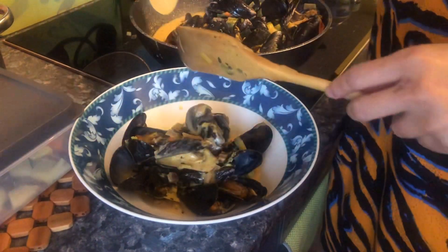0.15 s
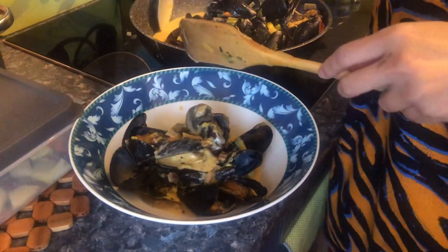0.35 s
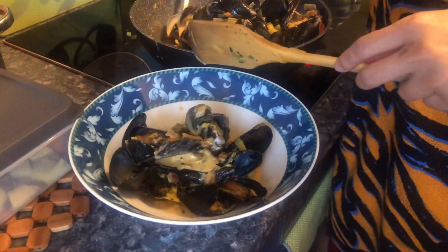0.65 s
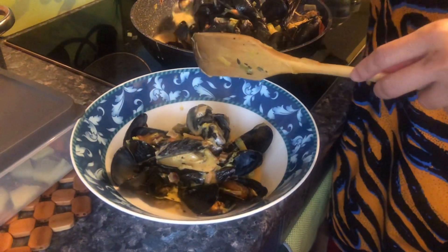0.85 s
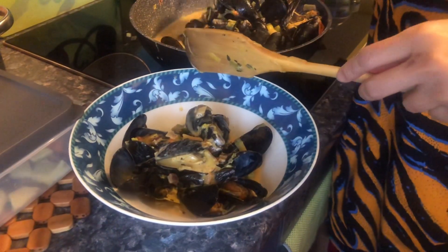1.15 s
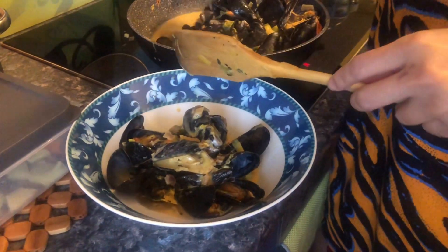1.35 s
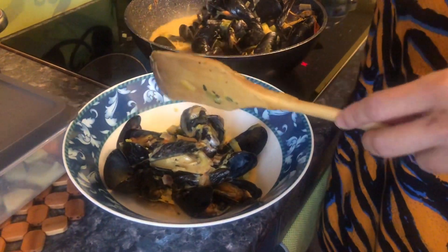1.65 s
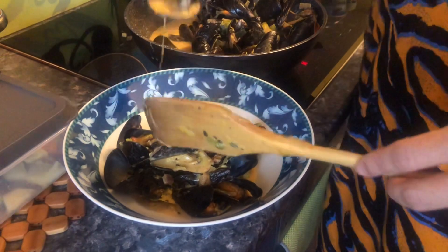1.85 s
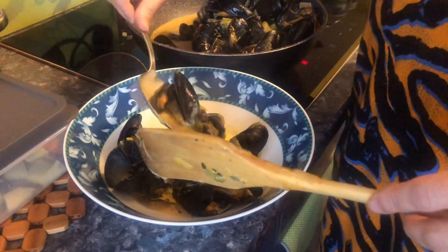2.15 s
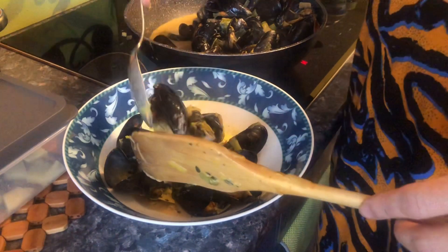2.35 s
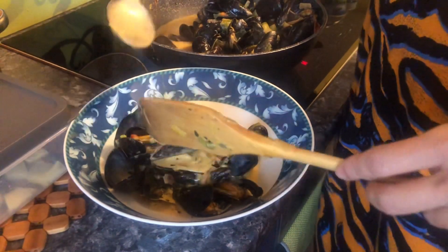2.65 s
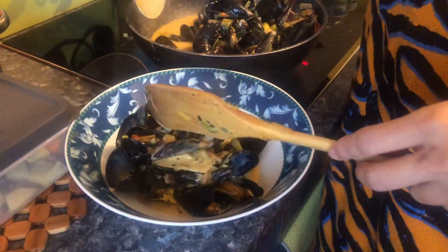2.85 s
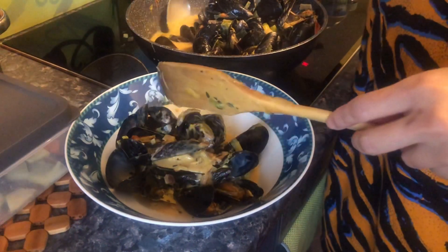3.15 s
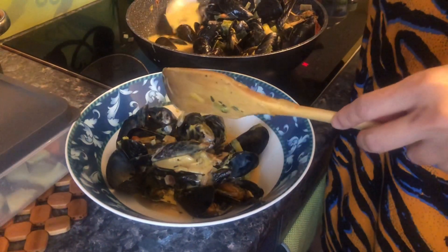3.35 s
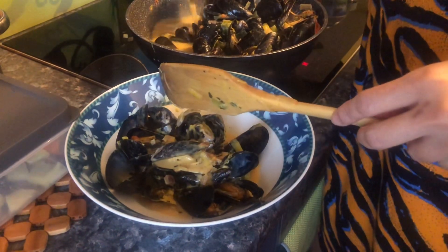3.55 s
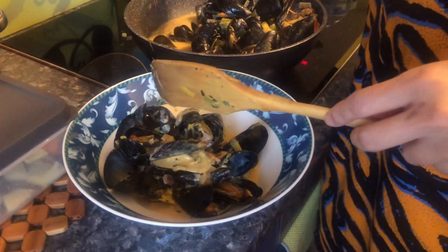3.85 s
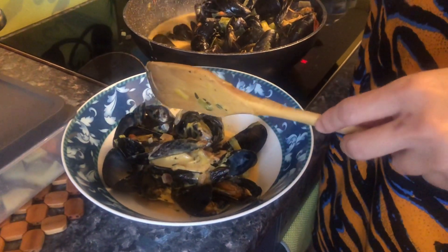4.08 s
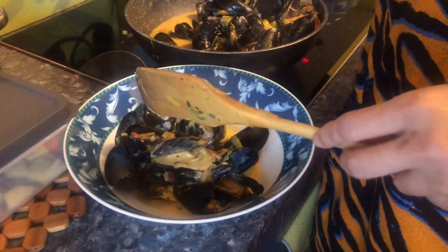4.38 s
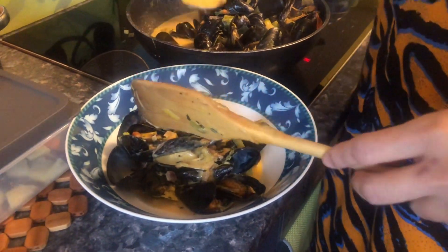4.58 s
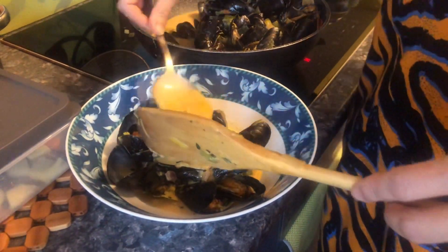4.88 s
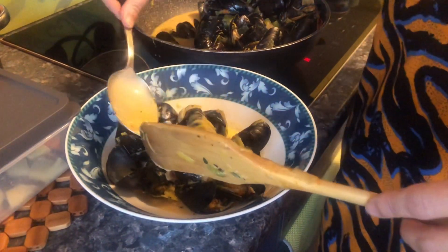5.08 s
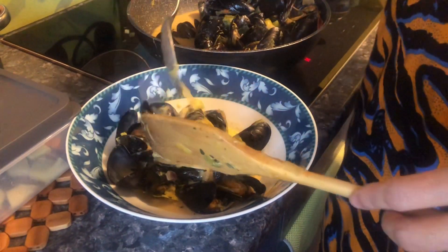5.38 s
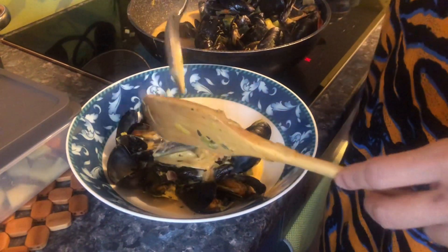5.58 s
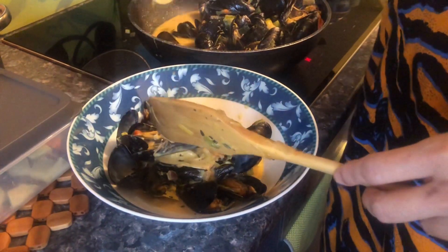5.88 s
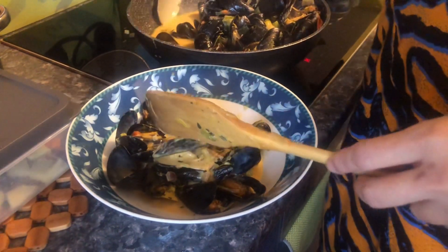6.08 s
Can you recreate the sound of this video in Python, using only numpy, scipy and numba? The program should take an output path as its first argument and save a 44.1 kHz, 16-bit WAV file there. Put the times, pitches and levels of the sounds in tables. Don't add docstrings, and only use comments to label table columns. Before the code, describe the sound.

Dry, hollow shells knock against a spoon, pot and glazed bowl in separate clusters. Sharp clicks die almost at once, with little scrapes, wet fizzing ticks and a short clear bowl ring between them. The worktop thuds dully under the pot. Nearly mono phone pickup, close, with short hard-room echoes, steady hiss, rumble and a very faint high whine.

```python
import sys
import numpy as np
from scipy import signal
from scipy.fft import rfft, irfft
from scipy.io import wavfile
from scipy.ndimage import uniform_filter1d
from numba import njit

SR = 44100
rng = np.random.default_rng(int(sys.argv[2]) if len(sys.argv) > 2 else 0)


def gain_from_db(level_db):
    decades = np.asarray(level_db, float) / 20
    return 10 ** decades


def dump_mix(stems):
    frames = np.atleast_2d(stems).T
    limited = np.clip(frames, -1, 1)
    pcm = np.round(limited * 32767).astype(np.int16)
    wavfile.write(sys.argv[1], SR, pcm)


N = 274322

# hollow/dB, body/dB, edge/dB
POT_KNOCKS = [(0.38, -27.5, -6.5, -9, -5), (0.5134, -42.5, -3, -25, 1), (0.5864, -19, -11, -8.5, -8),
              (0.6809, -39, 5, 12, -2.5), (0.7598, -29, -20.5, -9.5, -20), (1.1799, -35, -10, -9, -5),
              (1.1981, -28.5, -25, -18, -14), (3.0022, -31, -8.5, -12, -7.5),
              (3.0354, -22.5, -10.5, -20, 0), (3.2113, -17.5, -17.5, -6.5, -15),
              (3.24, -21.5, -9, -0.5, -2), (3.3303, -21.5, -22, -5.5, -8.5), (3.7054, -51, -14, 3, -16),
              (3.7664, -23.5, -19, -4.5, -7.5), (6.0931, -31, -6.5, -16, -11)]
BOWL_KNOCKS = [(2.0164, -59.5, -3, 6, 9), (2.153, -49, -17, -16, -6), (2.1708, -37, -24, -17, -5),
               (2.2244, -51, -21, -1, 6), (2.2359, -30, -16.5, -2, -8), (2.394, -50, -20, -1, -8),
               (2.4691, -26.5, -11, 1.5, -6), (2.5782, -54, 9.5, 14, -17), (4.9579, -25.5, -36, -5, -6),
               (5.0233, -43.5, -9, 0, -17), (5.0759, -49, 2, 13, -15), (5.1518, -32.5, -8.5, -10, 4.5)]
KNOCK_T60 = [0.036, 0.01, 0.01, 0.02, 0.015]


def shell_knocks():
    crowd = shaken_shells(POT_KNOCKS + BOWL_KNOCKS, KNOCK_T60, rise_s=0.00086, grit_db=3.5, crack_db=-28)
    return gain_from_db(-3.5) * crowd


# hollow/dB, body/dB, edge/dB
SKIDS = [(0.476, -43, 2, -25, -4), (0.684, -40.5, -1, -8, -13), (0.722, -40.5, -19, 0, -13),
         (0.7769, -39.5, -17, -17, -4.5), (0.8634, -53, 4, 16, -16), (0.8934, -45, -3, -1, -17),
         (0.9147, -45, -23, 5.5, -17), (0.926, -39, -25, -10, -22), (0.9546, -42.5, -7, 5, -17),
         (0.9754, -41, -6, -21, -14), (1.0927, -37, -7.5, -1, -7), (1.1044, -40, -15, -4, -17),
         (1.142, -45.5, 0, 5, -11), (4.2, -53.5, 4, 1.5, -12), (5.0344, -55, 0, -6, -10),
         (5.0994, -39, -13, -8, -9), (6.1803, -55, 9.5, -17, 4)]
SKID_T60 = [0.068, 0.09, 0.025, 0.068, 0.06]


def shell_skids():
    return gain_from_db(-8.5) * shaken_shells(SKIDS, SKID_T60, rise_s=0.0015, grit_db=5.5, crack_db=-12)


REGISTER_EDGES = [100, 450, 1500, 3900, 7800, 12500, 21000]
REGISTER_LEVELS = [0, -0.7, -0.4, -1.9, 4]


def shaken_shells(table, t60s, rise_s, grit_db, crack_db):
    out, t = np.zeros(N), np.arange(SR // 5) / SR
    for s, db, hollow_db, body_db, edge_db in table:
        jolts = gain_from_db(grit_db * np.repeat(rng.standard_normal(len(t) // 90), 90))
        crowd = rng.standard_normal(len(t))
        tick_db = -14.5 + 0.43 * edge_db
        levels = db + np.array([hollow_db, body_db, 0, edge_db, tick_db]) + REGISTER_LEVELS
        crack = 1 + gain_from_db(crack_db) * fade(t, 0.0017)
        attack = crack * (1 - np.exp(-t / rise_s)) * uniform_filter1d(jolts, 40)
        for row, level_db, t60 in zip(np.eye(7)[1:6], levels, t60s):
            burst = shaped(crowd, REGISTER_EDGES, row) * fade(t, t60) * attack
            add(out, s, gain_from_db(level_db) * unit(burst) * np.sqrt(np.mean(fade(t, t60) ** 2)))
    return out


# t/s, peak level/dB, f/Hz
LOW_RINGS = [(0.3825, -37.5, 1196), (0.5862, -21.5, 1300), (0.6809, -48, 1000), (2.236, -42, 2370),
             (2.4691, -31, 1180), (3.036, -27, 1232), (3.2123, -25.5, 2420), (3.24, -21, 1350),
             (3.3296, -23.5, 1890), (3.766, -38.5, 1180), (4.958, -41, 1940), (5.023, -43, 1220),
             (5.152, -36, 1220), (6.0926, -38.5, 1120)]
# t/s, peak level/dB, f/Hz
MID_RINGS = [(0.586, -36, 5400), (0.7602, -19.5, 3790), (1.197, -31, 4540), (2.17, -37, 2720),
             (2.2186, -33, 2740), (2.2363, -24.5, 3300), (2.372, -35.5, 2350), (2.394, -36, 3510),
             (2.4699, -16, 2495), (3.0021, -27, 3650), (3.0355, -24, 4360), (3.2124, -23, 2910),
             (3.3303, -17.5, 3300), (3.679, -39.5, 3140), (3.7663, -32, 4600), (4.958, -23, 3030),
             (3.24, -18, 5000), (3.3305, -27, 5240), (4.9582, -36, 4700), (5.0758, -30.5, 2800),
             (5.1525, -29, 4580)]
# t/s, peak level/dB, f/Hz
HIGH_RINGS = [
    (0.5861, -35, 8400),
    (2.1695, -31, 8370),
    (2.2358, -25.5, 9300),
    (2.4683, -24, 6700),
    (3.0021, -45, 8820),
    (3.036, -24, 5270),
    (3.3303, -25, 7970),
    (3.7658, -15.5, 6990),
    (4.958, -20, 9200),
    (5.1522, -12.5, 6590),
]
# t/s, peak level/dB, f/Hz
TICKS = [(0.5142, -39, 11600), (1.6157, -44, 12600), (1.8632, -44, 10400), (2.1525, -33, 10200),
         (2.173, -28.5, 11800), (2.4678, -17.5, 11240), (3.0026, -40, 12200), (3.0357, -41, 10100),
         (3.7065, -29, 13100), (4.9576, -20, 11960), (5.1527, -22, 12200)]


def shell_rings():
    low = rings(lasting(LOW_RINGS, 0.019), 3.6, 0.00063, 0.036, count=5)
    mid = rings(lasting(MID_RINGS, 0.016), -5, 0.00061, 0.042, count=8)
    high = rings(lasting(HIGH_RINGS, 0.019), -10.5, 0.00028, 0.0325, count=6)
    ticks = rings(lasting(TICKS, 0.017), -11, 0.00033, 0.112, count=20)
    return low + mid + high + ticks


# t/s, level/dB, tilt/(dB per octave)
LADLE_BLOWS = [
    (.38, -32.5, -1.5),
    (3.0355, -30, .5),
    (6.093, -37, -.5),
]
# f/Hz, level/dB, t60/s
LADLE_MODES = [(596, -4, 0.042), (1180, -6.5, 0.042), (3150, -3, 0.02), (3790, 0.5, 0.035),
               (5400, -6.5, 0.055), (6230, -3.5, 0.031), (6950, -14, .05), (7570, -10, .06)]


def ladle_rings():
    return rings(struck(LADLE_BLOWS, LADLE_MODES), 0, 0.00041, 0.011, count=2)


# t/s, peak level/dB, f/Hz, t60/s
POT_RINGS = [
    (.381, -30, 323, 0.075),
    (2.3, -42.5, 434, 0.067),
    (0.585, -38, 590, 0.21),
    (2.467, -36.5, 338, 0.13),
    (3.035, -35.5, 319, 0.089),
    (3.237, -37, 765, 0.1),
    (5.153, -40.5, 317.4, 0.18),
]


def pot_rings():
    return rings(POT_RINGS, -0.5, 0.0038)


# t/s, peak level/dB, f/Hz, t60/s
PINGS = [(.587, -43, 5400, 0.18), (2.225, -38.5, 1234, .05), (2.237, -58, 6700, 0.18),
         (2.2375, -48, 11900, .1), (2.4705, -29.5, 4830, 0.053), (3.003, -48, 8950, 0.3),
         (3.057, -39, 3200, 0.14), (3.248, -17.5, 1365, 0.034), (3.679, -53, 3270, 0.12),
         (3.717, -45, 2460, 0.037), (5.155, -35, 9300, 0.096), (5.1555, -43, 10750, 0.14),
         (5.156, -37, 12400, 0.099), (5.1565, -52, 13900, .12), (6.094, -33, 3040, 0.031)]


def pings():
    return rings(PINGS, 0, 0.00081)


# t/s, level/dB, tilt/(dB per octave)
BOWL_BLOWS = [
    (2.469, -54.5, -12),
    (5.153, -51.5, 6),
]
# f/Hz, level/dB, t60/s
BOWL_MODES = [(1864, -4.5, .84), (2610, 3, 0.53), (4700, -11, .2), (6426, -13, .33)]


def bowl_rings():
    return rings(struck(BOWL_BLOWS, BOWL_MODES), 0, 0.00081)


# t/s, peak level/dB, f/Hz, t60/s
THUDS = [
    (.381, -44, 190, 0.11),
    (3.245, -46, 150, 0.35),
    (6.1, -72, 119, .2),
]


def worktop_thuds():
    return rings(THUDS, 0, 0.01)


def rings(table, trim_db, rise_s, spread=0., count=1):
    out, t = np.zeros(N), np.arange(SR // 2)[:, None] / SR
    for s, db, hz, t60 in table:
        place, phase = rng.standard_normal((2, count))
        detune = (np.arange(count) - (count - 1) / 2 + 0.58 * place) * 3.63 / count
        span = t[:int(t60 * SR)]
        waves = np.sin(2 * np.pi * hz * (1 + spread * detune) * span + phase).sum(axis=1) / np.sqrt(count)
        shape = (fade(span, t60) * (1 - np.exp(-span / rise_s)))[:, 0]
        add(out, s, gain_from_db(db + trim_db) * unit(waves * shape) * np.sqrt(np.mean(shape ** 2) / 2))
    return out


def struck(blows, modes):
    return [(s, db + mode_db + tilt_db * np.log2(hz / 2600), hz, t60)
            for s, db, tilt_db in blows for hz, mode_db, t60 in modes]


def lasting(table, t60):
    return [(*row, t60) for row in table]


# start t/s, length t/s, level/dB, centre f/Hz
SCRAPES = [
    (.535, 0.033, -51.5, 695),
    (2.27, 0.035, -60, 2200),
    (2.385, .03, -57.5, 2660),
    (2.445, 0.011, -59, 2410),
    (2.54, 0.042, -70, 1650),
    (3.155, 0.047, -52, 706),
    (5.09, 0.047, -51.5, 1950),
    (6.195, .03, -60.5, 1100),
]


def shell_scrapes():
    return gain_from_db(-5) * grains(SCRAPES, per_s=2500, scatter_db=1.5, damp=0.9)


# start t/s, length t/s, level/dB, centre f/Hz
FIZZ = [
    (.49, .04, -49.5, 7700),
    (.555, .02, -54, 8400),
    (1.615, 0.036, -56, 12000),
    (2.14, .07, -64, 10200),
    (3.09, 0.12, -59, 8300),
    (3.7, .02, -56, 12400),
    (5.05, .09, -58, 10500),
]


def broth_fizz():
    return gain_from_db(-10) * grains(FIZZ, per_s=5000, scatter_db=1.2, damp=0.4)


# start t/s, length t/s, level/dB, centre f/Hz
HUM = [
    (.49, .07, -55, 640),
    (6.19, .04, -53, 640),
]


def ladle_hum():
    return grains(HUM, per_s=1500, scatter_db=1.5, damp=0.2)


def grains(table, per_s, scatter_db, damp):
    t, gain, hz = np.arange(N) / SR, np.zeros(N), np.full(N, 1000.)
    for s, length, db, centre in table:
        corners = [s - 0.027, s, s + length, s + length + 0.024]
        inside = (t > corners[0]) & (t < corners[-1])
        gain[inside] = gain_from_db(db - 37 * np.interp(t[inside], corners, [1, 0, 0, 1]))
        hz[inside] = centre
    clicks = (rng.random(N) < per_s / SR) * rng.standard_normal(N)
    clicks = clicks * gain_from_db(scatter_db * rng.exponential(size=N))
    return unit(svf(clicks, hz, damp)) * uniform_filter1d(gain, SR // 100)


# f/Hz, t60/s
KITCHEN_T60 = [(200, 0.56), (530, 0.39), (1400, 0.34), (3700, 0.28), (9700, 0.23), (16000, 0.34)]


def kitchen():
    t = np.arange(SR // 2) / SR
    noise = rng.standard_normal((2, len(t)))
    first, echoes = noise * (rng.random(len(t)) < .05 + t / .02) * (t > 0.0015)
    hz, t60 = np.transpose(KITCHEN_T60)
    tail = sum(shaped(echoes, hz, row) * fade(t, d) for row, d in zip(np.eye(len(hz)), t60))
    near = unit(even(first * fade(t, 0.043), 330))
    return (near + gain_from_db(-3) * unit(tail)) / np.sqrt(len(t))


# f/Hz, level/(dB per Hz)
HOUSE = [(12, -46), (20, -2), (55, 0.5), (69, -2.5), (86, -15), (237, -15.5), (265, -15)]
# f/Hz, level/(dB per Hz)
HISS = [(297, -9), (342, -14), (816, -17), (888, -19.5), (966, -18.5), (2240, -23), (15200, -24.5),
        (16500, -62)]
# t/s, boom level/dB, upper rumble against it level/dB
SHOVES = [
    (.59, -45.5, -8),
    (2.29, -68, 13),
    (3.24, -38.5, -1.5),
    (3.76, -56, -10),
    (4.4, -53, -12),
    (4.57, -62, -12),
    (4.75, -65, -21),
    (6.1, -65, 7),
]


def background():
    t = np.arange(N) / SR
    hz, db = np.transpose(HOUSE + HISS)
    air = gain_from_db(-55.5) * unit(shaped(rng.standard_normal(N), hz, gain_from_db(db)))
    boom, upper = gain_from_db(-60.5 + 2 * walk(3.96)), np.full(N, gain_from_db(-65))
    rise = 1 - np.exp(-t / 0.015)
    for s, boom_db, upper_db in SHOVES:
        add(boom, s, gain_from_db(boom_db) * rise * fade(t, 0.49))
        add(upper, s, gain_from_db(boom_db + upper_db) * rise * fade(t, 0.25))
    deep = unit(shaped(air, [75, 105], [1, 0])) * boom
    low = unit(shaped(air, [75, 105, 210, 300], [0, 1, 1, 0])) * upper
    hiss = shaped(air, [210, 300], [0, 1]) * gain_from_db(.3 * walk(2.5))
    whine = np.sin(2 * np.pi * 10451 * t + 0.87 * walk(3.6))
    return hiss + deep + low + gain_from_db(-75) * whine


def unit(x):
    return x / np.sqrt(np.mean(x ** 2))


def fade(t, t60):
    return np.exp(-np.log(1000) * t / t60)


def add(out, s, x):
    i = int(s * SR)
    out[i:i + len(x)] += x[:N - i]


def shaped(x, hz, gain):
    f = np.maximum(np.arange(len(x) // 2 + 1) * SR / len(x), 1)
    return irfft(rfft(x) * np.interp(np.log(f), np.log(hz), gain), len(x))


def even(x, width_hz):
    spectrum = rfft(x)
    power = uniform_filter1d(np.abs(spectrum) ** 2, int(width_hz * len(x) / SR))
    return irfft(spectrum / np.sqrt(power), len(x))


def walk(rate):
    k = int(SR / rate)
    steps = np.repeat(rng.standard_normal(N // k + 1), k)
    return unit(uniform_filter1d(uniform_filter1d(steps, k), k)[:N])


@njit
def svf(x, hz, damp):
    y, b, l = np.empty(len(x)), 0., 0.
    for i in range(len(x)):
        g = np.tan(np.pi * hz[i] / SR)
        v = (b + g * (x[i] - l)) / (1 + g * (g + damp))
        b, l, y[i] = 2 * v - b, l + 2 * g * v, damp * v
    return y


def scene():
    ringing = shell_rings() + ladle_rings()
    vessels = pot_rings() + pings() + bowl_rings() + worktop_thuds()
    rubbing = shell_scrapes() + broth_fizz() + ladle_hum()
    contacts = shell_knocks() + shell_skids()
    near = contacts + rubbing
    echoes = sum(signal.fftconvolve(x, kitchen())[:N] for x in (near, ringing))
    mid = near + ringing + echoes + vessels + background()
    side = gain_from_db(-22) * shaped(np.roll(contacts, 40), [4000, 7000, 14000], [0, .35, 1.5])
    return np.array([mid + side, mid - side])


def roll_off(x):
    return signal.sosfilt(signal.butter(12, 17010, fs=SR, output="sos"), x)


def record(dry):
    rounded = np.tanh(2.142 * dry) / 2.262
    top = signal.ellip(7, .2, 34, 15850, fs=SR, output="sos")
    mix = signal.sosfilt(top, rounded)
    return roll_off(mix)


dry = scene()
out = record(dry)
dump_mix(out)
```